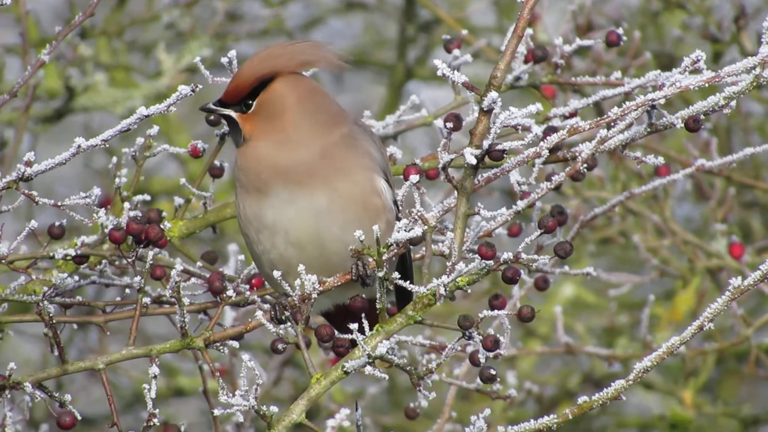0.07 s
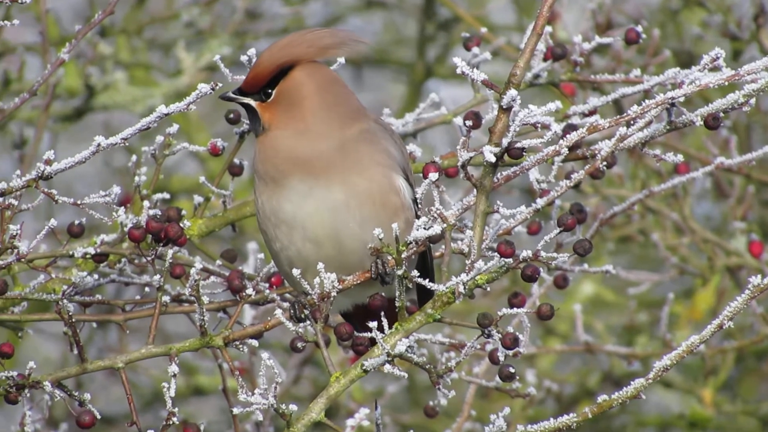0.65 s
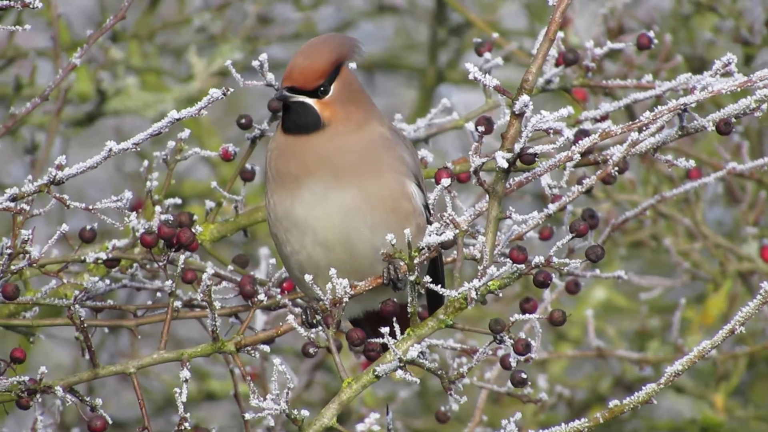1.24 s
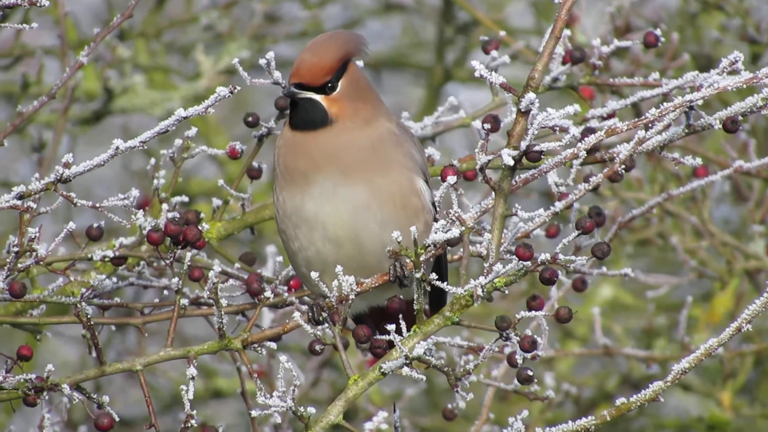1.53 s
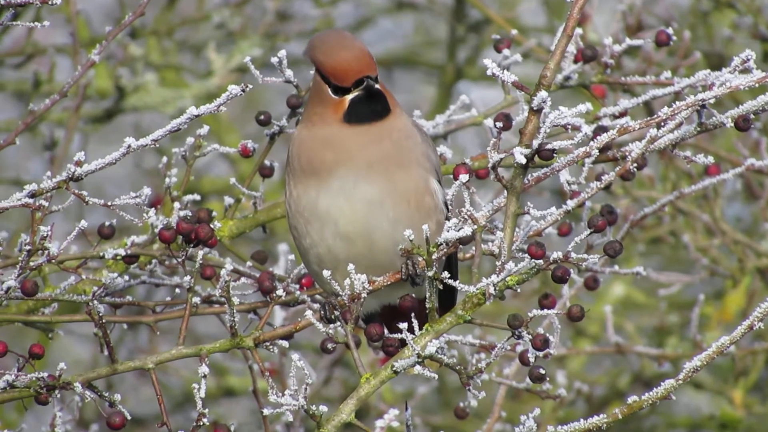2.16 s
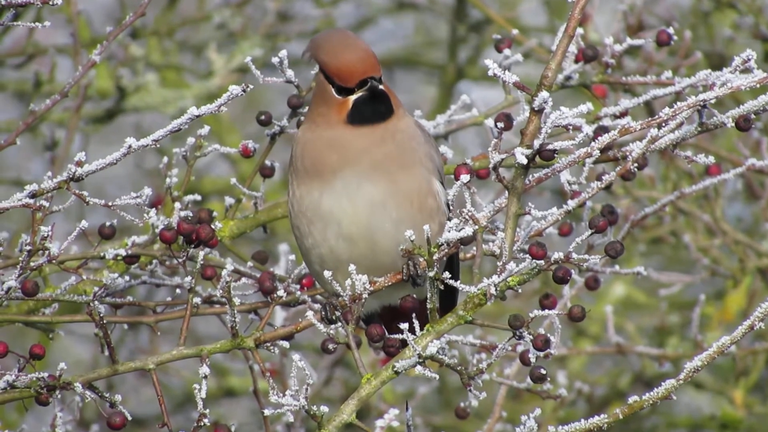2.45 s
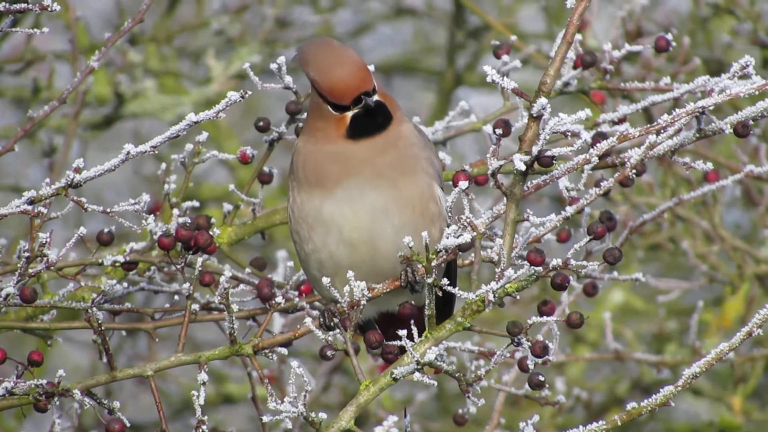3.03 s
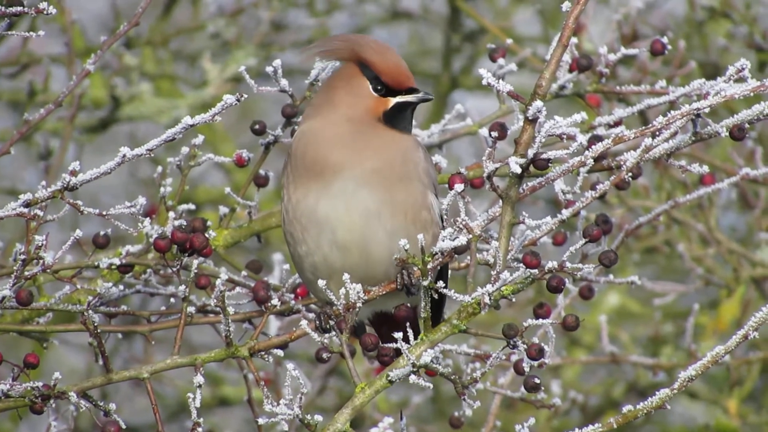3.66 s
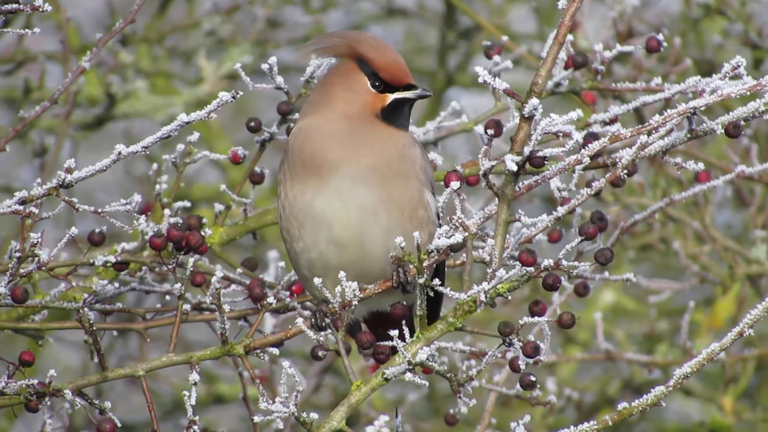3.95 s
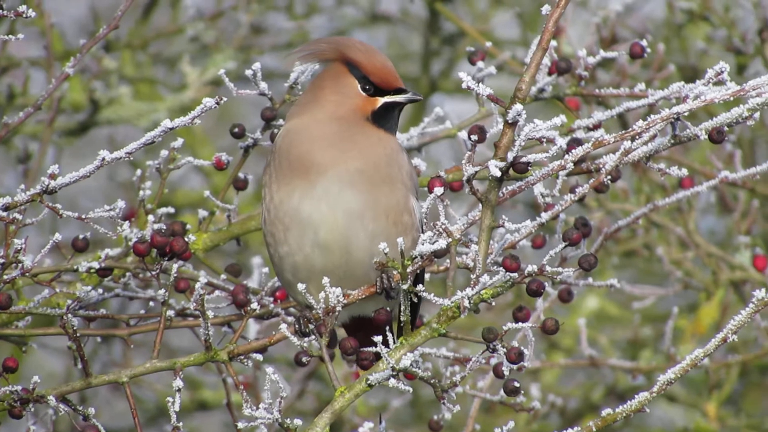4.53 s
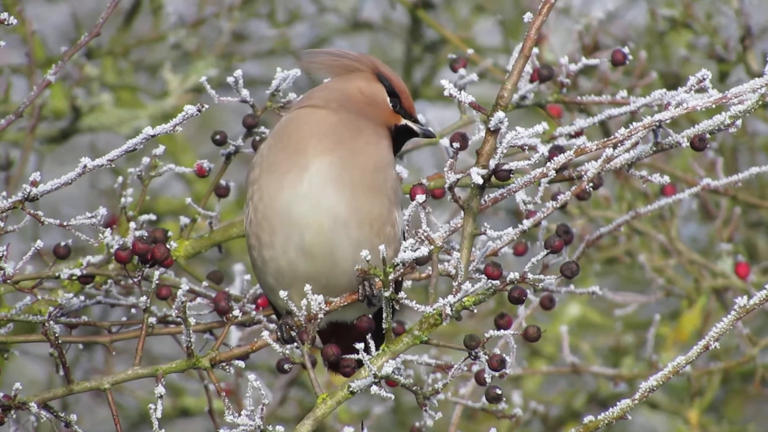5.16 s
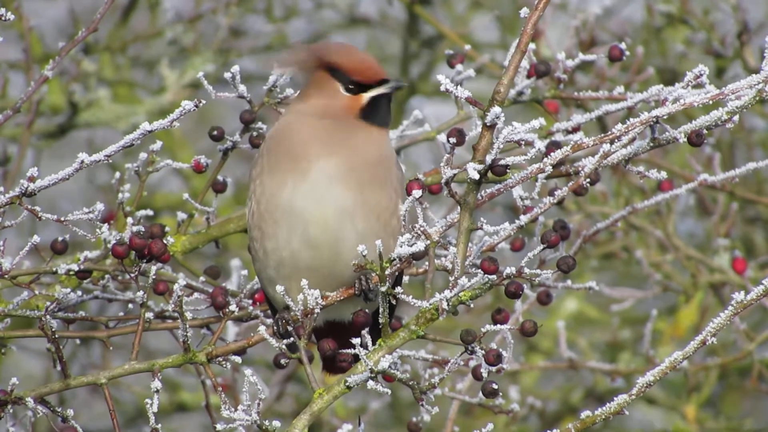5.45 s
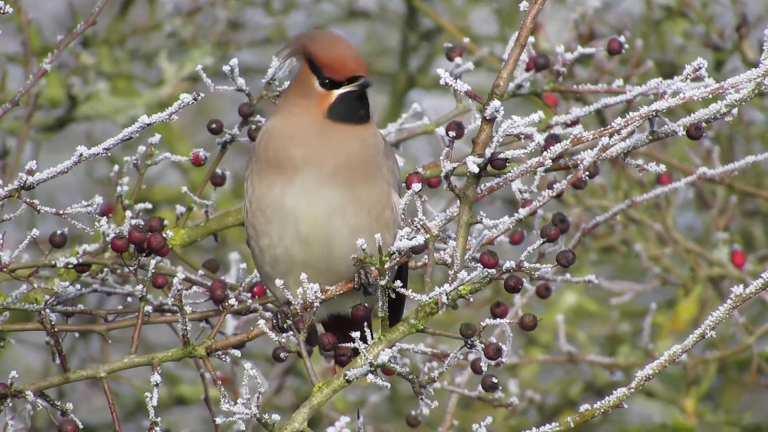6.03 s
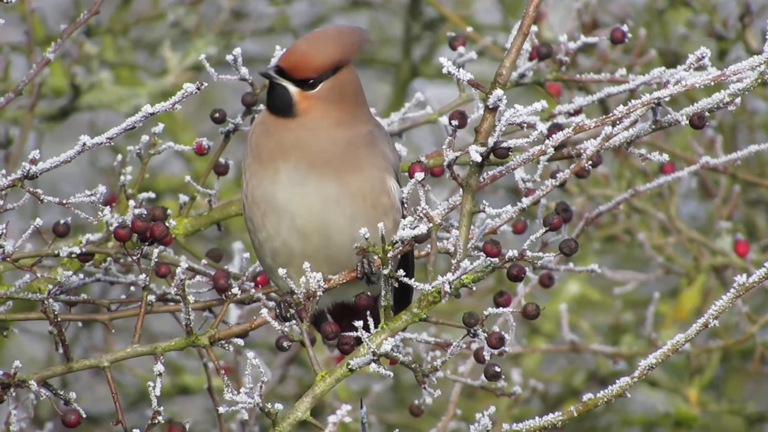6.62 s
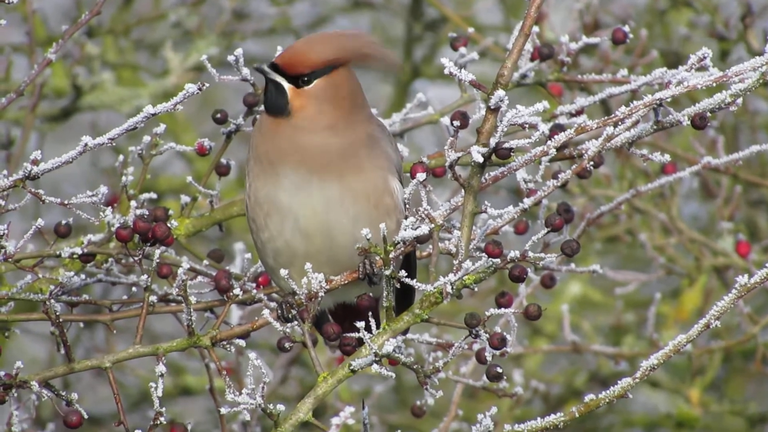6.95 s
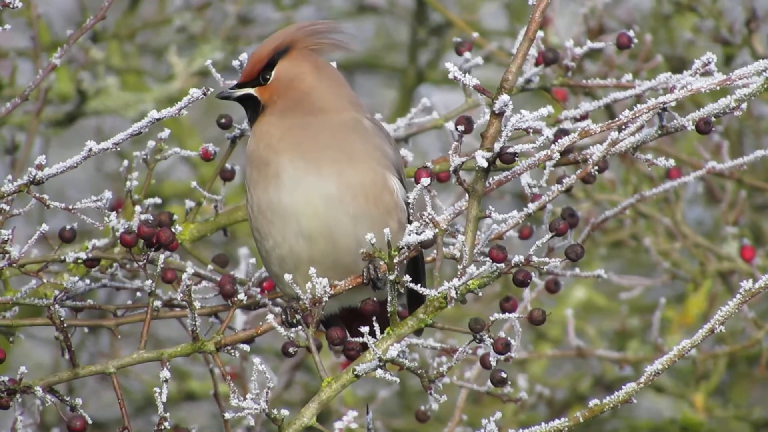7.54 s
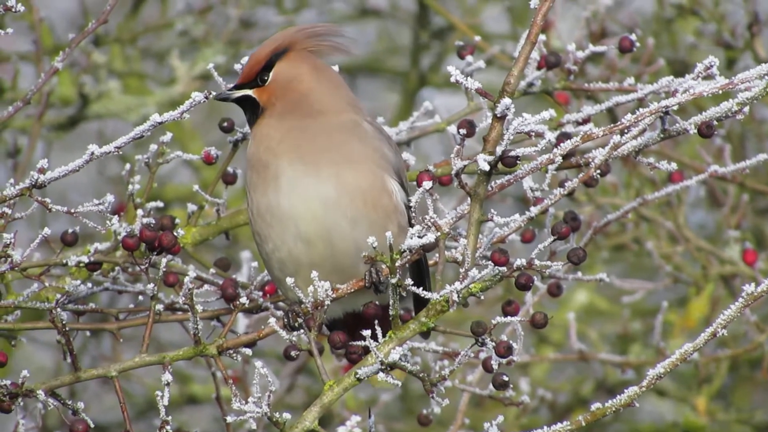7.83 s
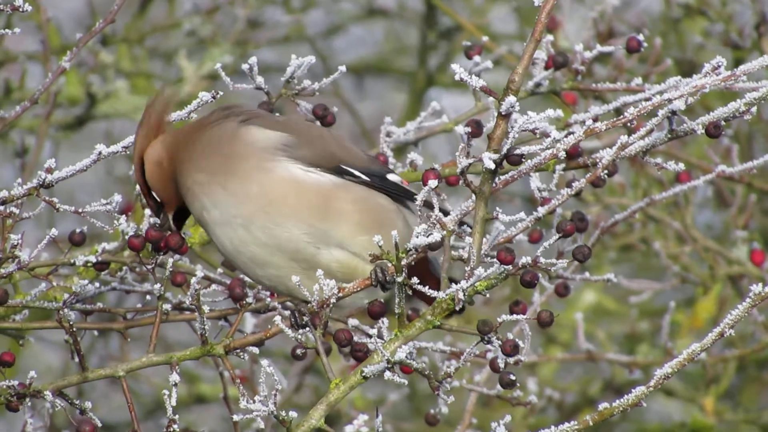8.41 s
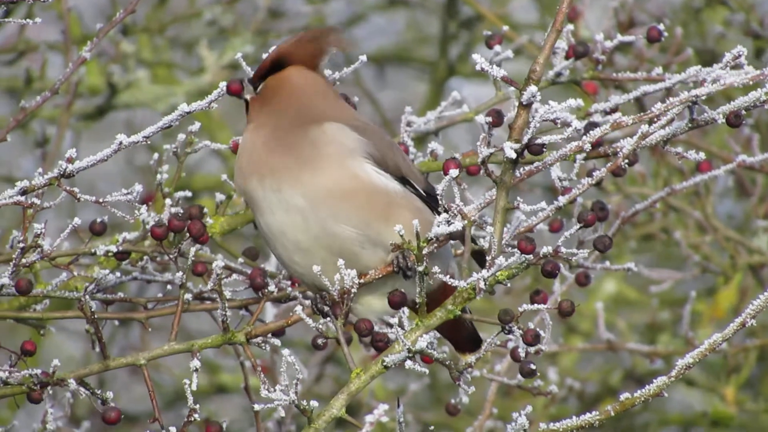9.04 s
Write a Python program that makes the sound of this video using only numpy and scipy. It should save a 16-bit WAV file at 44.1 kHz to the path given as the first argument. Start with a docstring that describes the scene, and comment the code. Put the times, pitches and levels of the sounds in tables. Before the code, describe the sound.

Outdoors at a hedge, distant traffic hums steadily under faint high trills, small chirps and short buzzy whistles. About four seconds in, a breeze starts rumbling on the stereo microphone, followed by several heavy low thumps, while a far engine drones. The nearby birds grow clearer in the second half, and near the end one snaps at a berry with a tiny dry crack.

```python
"""At a frosty hedge, with a stereo microphone out in the open air.
A breeze gets up and buffets the microphone's two ports, and single eddies thump them. Close by,
waxwings trill in swept, nearly pure syllables, a finch gives buzzy whistles and one bird snaps at a
berry. Farther off are small chirps and the start of a coo. In the distance an engine drones past
and the tyres and engines on a road merge into a steady hum, over faint microphone hiss."""
import sys
import numpy as np
from scipy import signal
from scipy.fft import rfft, irfft
from scipy.io import wavfile
from scipy.ndimage import uniform_filter1d, minimum_filter1d

SR = 44100
rng = np.random.default_rng(int(sys.argv[2]) if len(sys.argv) > 2 else 0)


def pcm_store(signal):
    """Save signal as 16-bit PCM."""
    levels = np.round(np.clip(np.atleast_2d(signal), -1, 1) * 32767)
    wavfile.write(sys.argv[1], SR, levels.astype(np.int16).T)


N = 409248
TIME = np.arange(N) / SR

# Wind on the microphone: calm, a puff, then a breeze with lulls. Each row: time in seconds, level in dB.
WIND_FORCE = [(0, -33), (1.15, -33.5), (1.5, -37), (2.05, -35.5), (2.57, -28.5), (2.8, -33), (3.2, -36),
              (3.85, -27), (4.0, -15.5), (4.24, -16.5), (4.42, -23), (4.74, -17.5), (4.88, -24.5),
              (5.35, -20), (6.3, -18.5), (7.6, -19), (8.35, -25), (8.62, -34), (9.08, -18.5), (9.28, -26.5)]
# Eddies hitting the microphone. Each row: time in seconds, peak in dB, pitch in Hz.
EDDY_THUMPS = [(5.495, -4, 75.5), (5.864, -6, 65), (6.36, -6, 55), (7.278, 1, 75), (8.055, -3.5, 86),
               (8.325, -5, 101), (9.079, -2, 100)]
# Waxwings in the branches. Each row: start in seconds, syllable count, starting top pitch in Hz,
# glide in Hz per second, full level in dB, opening swell in dB, fade in dB per second.
WAXWING_TRILLS = [(.197, 8, 6360, -300, -61, 1, 8), (2.978, 9, 6300, -200, -58, 3, 12),
                  (3.884, 2, 6300, 0, -62, 0, 0), (6.706, 8, 6760, -800, -51.5, 8, 15),
                  (7.1895, 8, 6340, 550, -40, 12.5, -4), (7.685, 5, 6170, -200, -62, -1, 25),
                  (8.339, 3, 6400, 7600, -43, 17, 0)]
# One waxwing syllable. Each row: time in seconds, share of top pitch, relative amplitude.
SYLLABLE_SHAPE = [(0, .82, 0), (.003, .94, .6), (.008, 1, 1), (.015, .935, .9), (.025, .888, 1.1),
                  (.037, .856, .9), (.041, .82, .55), (.0445, .68, .3), (.048, .55, 0)]
# The finch. Each row: start in seconds, pitch in Hz, level in dB, left minus right in dB, buzz 0-1.
FINCH_CALLS = [(-.005, 3660, -58, -5, 1), (1.436, 3810, -56.5, -2, 1), (4.559, 3750, -48, -8, 0.6),
               (6.128, 3730, -49, -3, 1), (7.138, 3570, -45, -6, 1)]
# One finch call. Each row: time in seconds, share of pitch, relative amplitude,
# full buzz depth as a share of pitch.
CALL_SHAPE = [(0, 1.03, .2, 0), (.011, .94, .8, .01), (.023, .945, .8, .015), (.036, .982, 1.3, .015),
              (.06, 1, 1.1, .04), (.102, 1.005, .8, .04), (.118, .98, .3, .05), (.14, .96, 0, .05)]
# Bill and twig cracks. Each row: start in seconds, peak in dB, low and high band edges in Hz.
BILL_TICKS = [(.853, -37, 2000, 8000), (2.1075, -43.5, 11500, 14500), (8.5042, -22.5, 1900, 14000)]
# The ring of the berry stalk. Each row: frequency in Hz, level in dB, seconds to fall by 60 dB.
STALK_MODES = [(1690, -33, .013), (2850, -28.5, 0.014), (5300, -34, .008), (7050, -35, 0.0074),
               (11800, -30, .005)]
# Small birds far off. Each row: start and length in seconds, first and last pitch in Hz, level in dB.
FAR_CHIRPS = [(0.546, .03, 1750, 1900, -54), (1.41, .05, 4520, 3350, -60), (1.444, 0.035, 3500, 3360, -57),
              (1.742, 0.021, 2770, 3150, -57), (1.91, .022, 3300, 3650, -56),
              (2.548, .026, 1700, 1730, -52)]
# A soft, distant coo. Each row: time in seconds, pitch in Hz, level in dB.
DOVE_COO = [(9.2, 507, -71), (9.225, 495, -39), (9.255, 490, -36), (9.28, 482, -41)]
# A distant engine easing off twice. Each row: time in seconds, level in dB, drone centre in Hz.
ENGINE_DRONE = [(0, -71, 195), (3.3, -47.5, 205), (4.2, -39, 197), (4.65, -40, 222), (5.1, -53, 215),
                (5.5, -39.5, 238), (6.1, -44, 228), (6.8, -36.5, 212), (7.9, -50.5, 225), (8.5, -45, 250),
                (9.28, -44.5, 262)]
# The far road's colour. Each row: frequency in Hz, relative level in dB.
ROAD_SPECTRUM = [(20, -4), (40, 13), (70, 15), (97, 13), (125, 4), (200, 1), (380, -1), (600, -1),
                 (730, -1.5), (830, -0.5), (930, -4.5), (1150, -8.5), (1500, -17), (2100, -27)]
# The road in stereo. Each row: frequency in Hz, left-right correlation, left minus right in dB.
ROAD_STEREO = [(60, 1, -1), (200, 0.71, -2.5), (402, 0.51, -2.5), (700, 0.8, -4), (1310, 0.38, -3.5),
               (2200, -0.76, 1)]
# The colour of the microphone's hiss. Each row: frequency in Hz, relative level in dB.
HISS_SPECTRUM = [(1000, 2.5), (2700, 0), (4500, -4), (7400, -5.5), (8300, -8.5), (12000, -12.5),
                 (14000, -19.5), (15500, -24)]
# Narrow bands the camera cuts out. Each entry: centre in Hz.
CAMERA_NOTCHES = [3935, 7870]


def wind(calm_hz=45.0, gust_hz=100.0, low_hz=23.8, steepness=3.6, flutter_db=1.5, leak_db=-15.0):
    """Turbulence pushes the two ports in opposite senses; faster air sheds smaller, higher eddies."""
    force_db = in_time(WIND_FORCE)[0] + flutter_db * drift(rate_hz=5.4)
    speed = np.clip((force_db + 35) / 18, 0, 1)
    corner_hz = calm_hz + (gust_hz - calm_hz) * speed
    edges_hz = np.geomspace(10, 450, 12)
    white = rng.standard_normal((2, 2, N))
    rumble = np.zeros((2, N))
    for k, (low, high) in enumerate(zip(edges_hz, edges_hz[1:])):
        hz = np.sqrt(low * high)
        rolloff = np.hypot(1, (low_hz / hz) ** 2) * np.hypot(1, (hz / corner_hz) ** steepness)
        rumble += band(white[k % 2], low, high) / rolloff
    rumble = band(rumble, 6.9, 226)
    # the buffets keep an even strength within a gust
    side, mid = rumble / np.sqrt(uniform_filter1d(rumble ** 2, size=4000, axis=1) + 1e-18)
    ports = from_db(leak_db) * mid + side * [[1], [-1]]
    return from_db(force_db) * ports * pan(left_db=0.84)


def eddies(right_share=0.71):
    """A vortex passing the microphone is one dip of pressure between two rises."""
    out, t = np.zeros(N), np.arange(-SR // 25, SR // 25) / SR
    for centre_s, peak_db, hz in EDDY_THUMPS:
        spread = (np.pi * hz * t) ** 2
        add(out, centre_s + t[0], from_db(peak_db) * (2 * spread - 1) * np.exp(-spread))
    return out * [[1], [-right_share]]


def trill_syllables(beat_s=.0526, attack_s=.14, seesaw=0.0162, scatter_db=1.0):
    """Trills keep an even beat while the pitch seesaws and glides. Yields start, top pitch and level."""
    for start_s, count, first_hz, glide, full_db, swell_db, fade in WAXWING_TRILLS:
        for k in range(round(count)):
            age = k * beat_s
            top_hz = (first_hz + glide * age) * (1 + seesaw * (-1) ** k)
            below_db = swell_db * max(0, 1 - age / attack_s) + fade * max(0, age - attack_s)
            yield start_s + age, top_hz, full_db - below_db + scatter_db * rng.standard_normal()


def waxwings(waver=0.012, overtone_db=-17.0, soft_sweep=0.744):
    """Close by in the hedge: each syllable is a near sine that flicks up, slides down and drops away."""
    t = TIME[:round(SYLLABLE_SHAPE[-1][0] * SR)]
    tone, overtone = np.zeros((2, N))
    bend, loudness = in_time(SYLLABLE_SHAPE, t)
    middle = np.median(bend)
    unsteady = 1 + waver * drift(rate_hz=250)
    for start_s, top_hz, level_db in trill_syllables():
        sweep = np.interp(level_db, [-56, -42], [soft_sweep, 1])  # soft syllables sweep less
        pitch = top_hz * (middle + sweep * (bend - middle)) * np.interp(start_s + t, TIME, unsteady)
        phase = phase_of(pitch)
        add(tone, start_s, from_db(level_db) * loudness * np.sin(phase))
        add(overtone, start_s, from_db(level_db + overtone_db) * loudness * np.sin(2 * phase))
    song = tone * pan(left_db=-1.5) + overtone
    # the lag brings the overtone's short wave to the two ports nearly in opposite phase
    return outdoors(song, lag_s=.000033, wet_db=-12, t60=.3)


def finch(buzz_hz=208.0, waver=0.012, throb=.4):
    """Near and to the right: a short whistle that dips and rises, its pitch shaken into a buzz."""
    t, out = TIME[:round(CALL_SHAPE[-1][0] * SR)], np.zeros((2, N))
    bend, loudness, depth = in_time(CALL_SHAPE, t)
    unsteady = 1 + waver * drift(rate_hz=140)
    for start_s, hz, level_db, left_db, buzz in FINCH_CALLS:
        shake = buzz * np.sin(2 * np.pi * buzz_hz * t)
        pitch = hz * (bend + depth * shake) * np.interp(start_s + t, TIME, unsteady)
        call = loudness * (1 - throb * shake) * np.sin(phase_of(pitch))
        add(out, start_s, from_db(level_db) * call * pan(left_db))
    return outdoors(out, lag_s=.00006, wet_db=-7, t60=.33)


def berry(crack_t60=0.005, snap_s=8.5044):
    """Tiny dry cracks from bill and twigs, close up; the snapping stalk also rings briefly."""
    t, out = TIME[:SR // 40], np.zeros((2, N))
    for start_s, peak_db, low_hz, high_hz in BILL_TICKS:
        burst = rng.standard_normal((2, len(t))) * from_db(-60 * t / crack_t60)
        crack = band(burst, low_hz, high_hz)
        add(out, start_s, from_db(peak_db) * crack / np.abs(crack).max())
    for hz, level_db, t60 in STALK_MODES:
        ring = np.sin(2 * np.pi * (hz * t + rng.random((2, 1)))) * from_db(-60 * t / t60)
        add(out, snap_s, from_db(level_db) * ring)
    return out * pan(left_db=-3.0)


def far_birds():
    """Single short slurs, blurred by distance."""
    out = np.zeros(N)
    for start_s, length_s, first_hz, last_hz, level_db in FAR_CHIRPS:
        pitch = np.linspace(first_hz, last_hz, round(length_s * SR))
        chirp = signal.windows.tukey(len(pitch), .5) * np.sin(phase_of(pitch))
        add(out, start_s, from_db(level_db) * chirp)
    return outdoors(np.array([out, out]), lag_s=0, wet_db=-6, t60=.3)


def dove():
    """The start of a distant coo, almost a pure tone."""
    hz, level_db = in_time(DOVE_COO)
    return from_db(level_db) * np.sin(phase_of(hz)) * (TIME > DOVE_COO[0][0])


def engine():
    """An exhaust drone, smeared by its long path into a narrow band that follows the revs."""
    level_db, hz = in_time(ENGINE_DRONE)
    return from_db(level_db) * narrow_band(hz, spread_hz=31.7) * pan(left_db=-2.0)


def road(tyre_band_db=-40, air_hz=2700):
    """Many far tyres and engines merge to a steady roar, a little to the right."""
    hz = np.fft.rfftfreq(N, 1 / SR)
    colour_db, = at_hz(ROAD_SPECTRUM, hz)
    alike, left_db = at_hz(ROAD_STEREO, hz)
    mid, side = rfft(rng.standard_normal((2, N)))
    air = 1 / np.hypot(1, (hz / air_hz) ** 3)  # distance swallows the treble
    ports = np.sqrt(1 + alike) * mid + np.sqrt(1 - alike) * side * [[1], [-1]]
    roar = irfft(ports * from_db(colour_db) * air * pan(left_db), N)
    tyre_band_rms = np.std(band(roar.mean(axis=0), 350, 1500))
    return from_db(tyre_band_db) * roar / tyre_band_rms


def tyre_whine(level_db=-55.5):
    """Treads sing faintly and steadily on the far asphalt."""
    return from_db(level_db) * narrow_band(hz=831, spread_hz=45.0) * pan(left_db=-3.0)


def microphone_hiss(level_db=-51.0):
    """Each channel has its own steady hiss."""
    colour_db, = at_hz(HISS_SPECTRUM, np.fft.rfftfreq(N, 1 / SR))
    spectrum = rfft(rng.standard_normal((2, N))) * from_db(colour_db)
    return from_db(level_db) * rms_one(irfft(spectrum, N))


def outdoors(x, lag_s, wet_db, t60):
    """A bird to the right reaches the left port late; hedge and wall scatter a thin tail."""
    t = TIME[:SR // 2]
    tail = rng.standard_normal((2, len(t))) * from_db(-60 * t / t60) * (t > .006)
    tail = from_db(wet_db) * rms_one(tail) / np.sqrt(len(t))
    direct = np.array([np.interp(TIME - lag_s, TIME, x[0]), x[1]])
    return direct + signal.fftconvolve(x, tail, axes=1)[:, :N]


def narrow_band(hz, spread_hz):
    """A tone smeared into a band of noise about its pitch; rms 1."""
    phase = phase_of(hz * np.ones(N))
    return drift(spread_hz) * np.cos(phase) + drift(spread_hz) * np.sin(phase)


def drift(rate_hz):
    """A random wander of rms 1, mostly slower than rate_hz."""
    hz = np.fft.rfftfreq(N, 1 / SR)
    return rms_one(irfft(rfft(rng.standard_normal(N)) / (1 + (hz / rate_hz) ** 2), N))


def phase_of(hz):
    """Running phase of a moving pitch, in radians."""
    return 2 * np.pi * np.cumsum(hz) / SR


def from_db(db):
    """Decibels to gain."""
    return 10 ** (np.asarray(db) / 20)


def rms_one(x):
    """Scale to rms 1."""
    return x / np.sqrt(np.mean(x ** 2) + 1e-20)


def in_time(rows, t=TIME):
    """Columns of a curve at the times t."""
    times, *columns = np.transpose(rows)
    return [np.interp(t, times, column) for column in columns]


def at_hz(rows, hz):
    """Columns of a spectrum at the frequencies hz."""
    row_hz, *columns = np.transpose(rows)
    return [np.interp(np.log(hz + 1e-9), np.log(row_hz), column) for column in columns]


def band(x, low_hz, high_hz):
    """Second-order band-pass."""
    return signal.sosfilt(signal.butter(2, [low_hz, high_hz], "band", fs=SR, output="sos"), x)


def pan(left_db):
    """Channel gains that put the left left_db above the right."""
    return from_db(np.array([[.5], [-.5]]) * left_db)


def add(out, start_s, sound):
    """Mix a sound in at a moment."""
    at = round(start_s * SR) + np.arange(sound.shape[-1])
    inside = (at >= 0) & (at < N)
    out[..., at[inside]] += sound[..., inside]


def scene():
    """Birds near and far, distant traffic and wind on the microphone."""
    birds = waxwings() + finch() + far_birds() + dove() + berry()
    traffic = road() + tyre_whine() + engine()
    return birds + traffic + microphone_hiss() + wind() + eddies()


def record(dry, notch_widths_hz=(230., 190.), ceiling=.92, cutoff_hz=15150):
    """The camera notches out two narrow bands, ducks the hardest thumps and cuts the top."""
    for hz, width_hz in zip(CAMERA_NOTCHES, notch_widths_hz):
        dry = signal.lfilter(*signal.iirnotch(hz, hz / width_hz, fs=SR), dry)
    safe_gain = np.minimum(1, ceiling / np.abs(dry).max(axis=0))
    limiter = uniform_filter1d(minimum_filter1d(safe_gain, size=441), size=441)  # 10 ms windows
    low_pass = signal.ellip(10, .1, 80, cutoff_hz, fs=SR, output="sos")
    return signal.sosfilt(low_pass, dry * limiter)


dry = scene()
out = record(dry)
pcm_store(out)
```